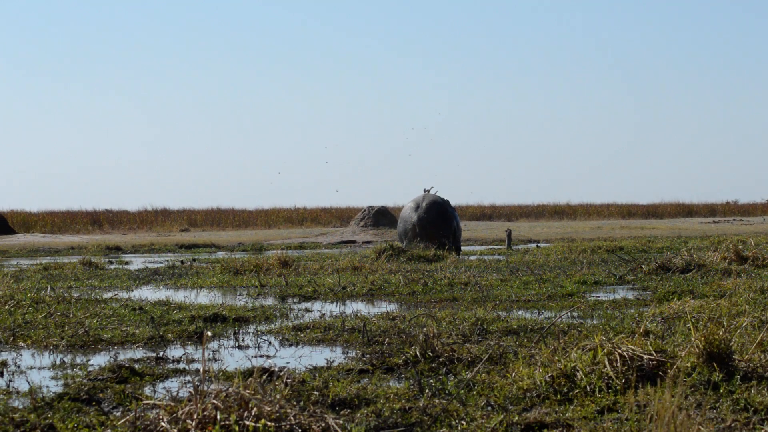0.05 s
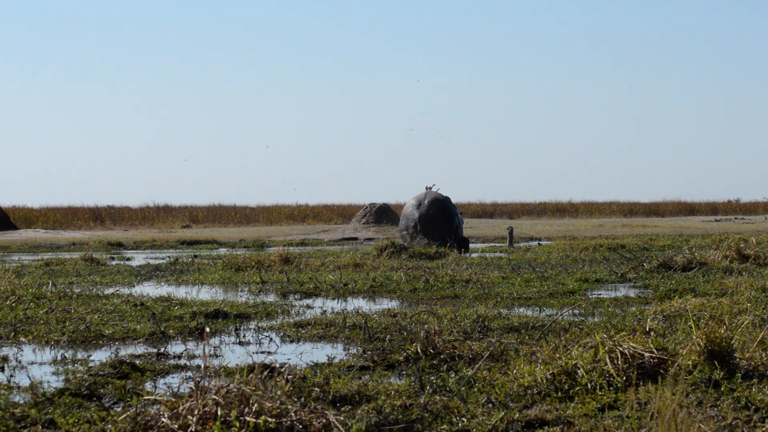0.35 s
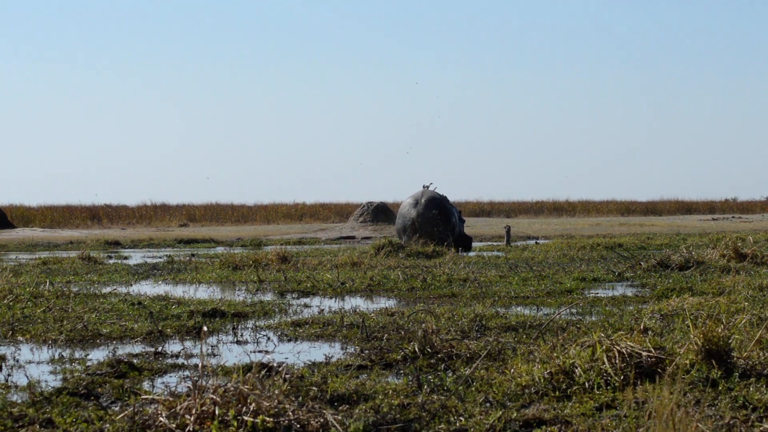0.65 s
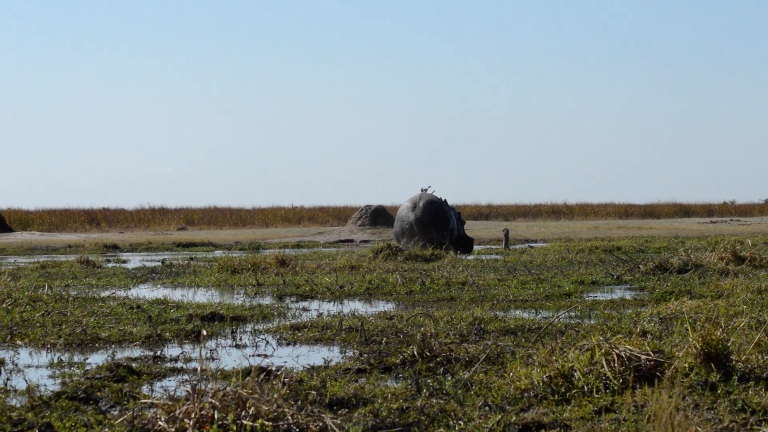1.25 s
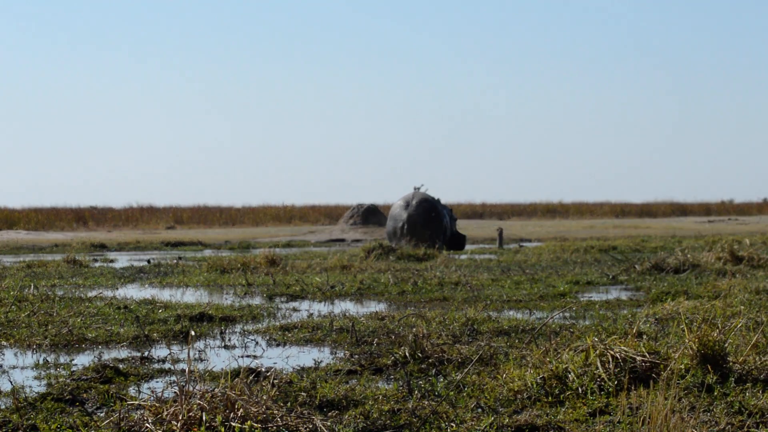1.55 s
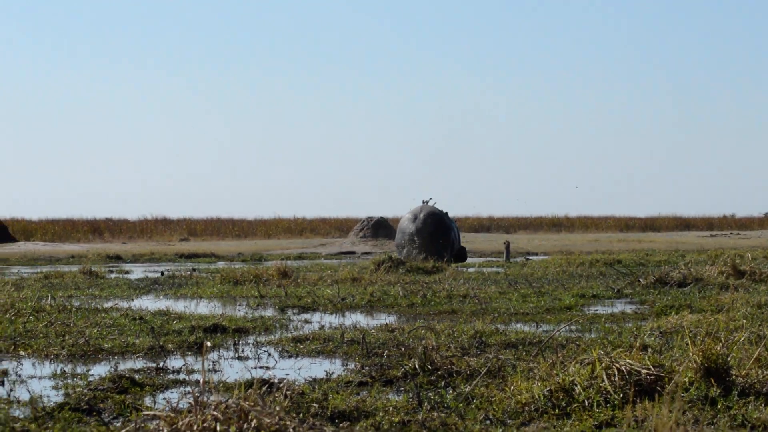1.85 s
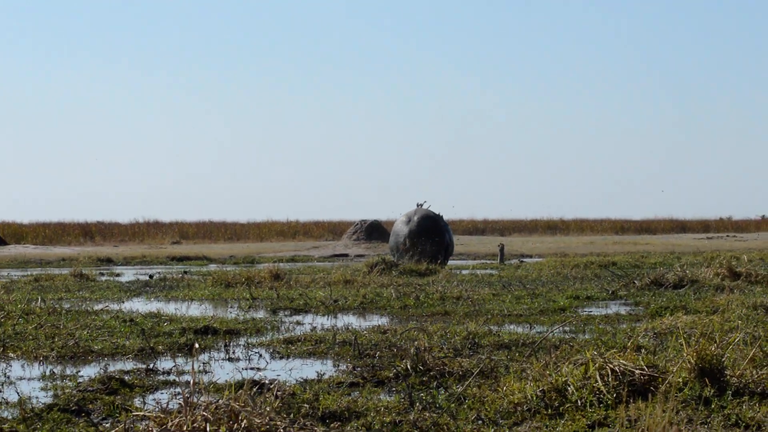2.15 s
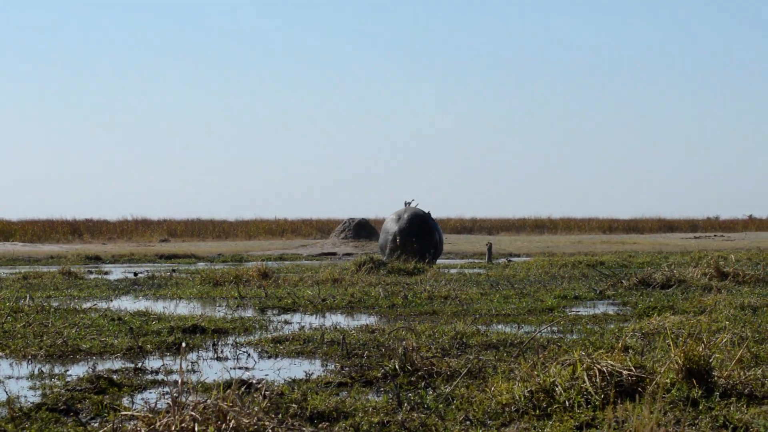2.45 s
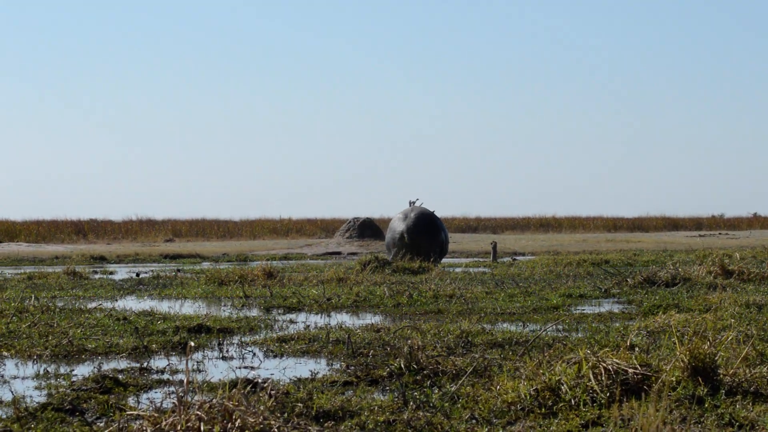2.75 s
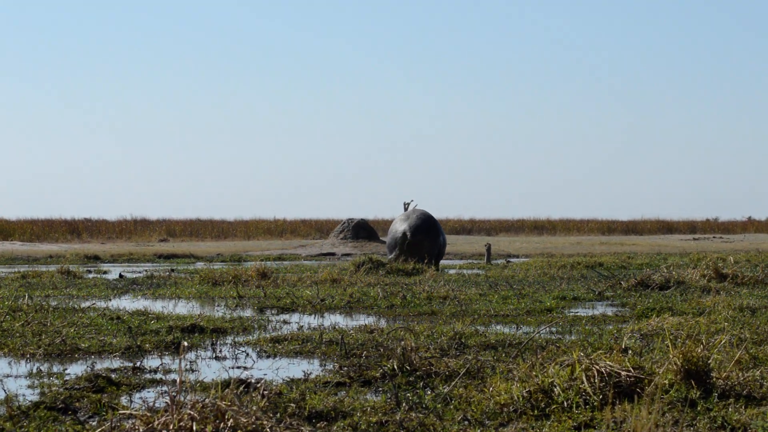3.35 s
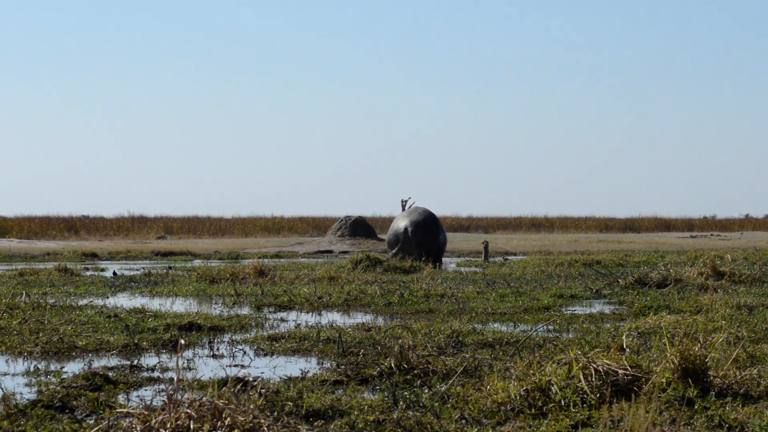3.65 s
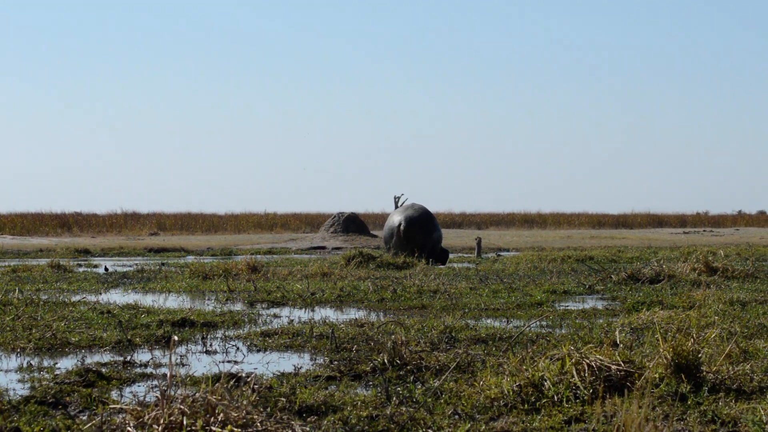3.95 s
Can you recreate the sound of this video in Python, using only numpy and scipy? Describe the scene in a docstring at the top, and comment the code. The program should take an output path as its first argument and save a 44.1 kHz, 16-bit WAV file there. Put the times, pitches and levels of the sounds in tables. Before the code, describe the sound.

Four short, raspy animal screeches, probably a bird, over low wind rumble outdoors.

```python
"""An animal close by, probably a bird, gives four harsh rasping calls on open wet grassland.
Each call is a fluttering jet of air that excites the resonances of the throat (source and filter),
with a pop near its start and a soft rasp after it. Wind buffets the microphone; small birds chirp
and whistle far off, and the wet ground ticks."""
import sys
import numpy as np
from scipy import signal
from scipy.fft import rfft, irfft
from scipy.io import wavfile
from scipy.ndimage import uniform_filter1d, map_coordinates

SR = 44100
rng = np.random.default_rng(int(sys.argv[2]) if len(sys.argv) > 2 else 0)


def to_wav(s):
    """Save 16-bit WAV."""
    ch = np.atleast_2d(s).T  # columns
    pcm = np.round(np.clip(ch, -1, 1) * 32767)  # PCM
    wavfile.write(sys.argv[1], SR, pcm.astype(np.int16))


N = 176400
TIME = np.arange(N) / SR

ATTACK_S, RELEASE_DB_PER_S = 0.0054, 1050
OPENING_DB = -4.5   # weaker air flow before the pop
FLUTTER_HZ, FLUTTER_JITTER, FLUTTER_DECAY_PER_CYCLE = 109.3, 0.14, 5
THROAT_RISE, THROAT_RISE_S = 0.13, 0.024   # share by which the screech is low at the pop; settling time
SQUEAL_HZ, SQUEAL_WANDER, SQUEAL_DB = 2860, 0.01413, -4
POP_DELAY_S, POP_WIDTH_S, POP_FALL_PER_S = 0.022, 0.0023, 48
SPIT_DB, SPIT_DELAY_S, SPIT_WIDTH_S = -20, 0.0031, 0.0021
AFTER_DELAY_S, AFTER_LENGTH_S, AFTER_ATTACK_S = 0.013, 0.044, 0.03
EDDIES_DB, RUMBLE_DB, FLAPS_DB = -2, 1.5, -35.5
BUZZ_HZ, BUZZ_DEPTH, BUZZ_WANDER = 229, 0.096, 0.018
TICK_DB, TICK_DECAY_S, TICK_RING = -12.5, 0.0039, 0.6
PATTER_PER_S, PATTER_DB, GRASS_DB = 36, -46.5, -56


def rasping_calls():
    """Source and filter: a pulsed jet drives the throat in a blend of screech and hiss."""
    # Each row: start in seconds, length in seconds, level in dB, swell in dB per second, the screech's
    # share of the power, pop level in dB, pop frequency in Hz, level of the after-rasp in dB.
    calls = [(1.358, 0.12, -17.5, -2, 0.79, -12, 1761, -35.5), (1.614, .16, -22, 3, 0.04, -22.5, 1600, -27),
             (1.891, 0.093, -18, 62, 0.82, -25, 1050, -35),
             (2.119, 0.049, -19.5, -25, 0.12, -18, 2008, -38.5)]
    # Throat resonances when screeching and when hissing.
    # Each row: frequency in Hz, nominal width in Hz, relative gain in dB.
    screech_resonances = [(2030, 150, -5), (2910, 150, 4), (3775, 100, -0.5), (4530, 190, -3),
                          (5470, 230, -10.5), (6360, 160, -9), (7070, 160, 0.5), (8270, 570, 0.5),
                          (8470, 180, -7), (9620, 350, -4.5), (11430, 300, -7.5), (12500, 240, -18),
                          (12900, 500, -19), (15400, 400, -28)]
    hiss_resonances = [(1116, 165, -8), (2014, 224, 1.5), (2990, 220, 3), (3550, 310, -1),
                       (4010, 130, -0.5), (4370, 150, 3), (4820, 330, 2.5), (5600, 240, -14),
                       (6550, 380, -4.5), (6960, 280, -12), (7980, 530, -7.5), (9500, 620, -6.5),
                       (11300, 300, -10), (13200, 750, -16)]
    # The bright spit that opens each call. Each row: frequency in Hz, relative spectral level in dB.
    spit_spectrum = [(2000, -16), (5000, -4), (8000, -1.5), (11000, 0), (13000, -19), (16000, -23)]
    air = fluttering_air(depth=0.5)
    screech = rms_one(throat(air, screech_resonances) + squeal(air))
    hiss = throat(fluttering_air(depth=0.24), hiss_resonances)
    splutter = rms_one(resonate_twice(noise(), hz=940, stage_width_hz=1800))
    spit = colour(noise(), spit_spectrum)
    out = np.zeros(N)
    for start, length, db, swell, share, pop_db, pop_hz, after_db in calls:
        t = TIME - start
        opened = np.clip((t - POP_DELAY_S) / ATTACK_S + 1, 0, 1)   # reaches 1 at the pop
        share = share * opened
        voice = np.sqrt(share) * rising(screech, t) + np.sqrt(1 - share) * hiss
        effort_db = db + swell * (np.clip(t, 0, length) - length / 2) + OPENING_DB * (1 - opened)
        out += from_db(effort_db) * envelope(start, length, ATTACK_S) * voice
        out += from_db(SPIT_DB) * gaussian(t - SPIT_DELAY_S, SPIT_WIDTH_S) * spit
        out += from_db(pop_db) * pop(t, pop_hz, splutter)
        after_rasp = envelope(start + length + AFTER_DELAY_S, AFTER_LENGTH_S, AFTER_ATTACK_S)
        out += from_db(after_db) * after_rasp * hiss
    return out


def fluttering_air(depth):
    """Flow modulation: an unevenly flapping membrane chops a share `depth` of the air into pulses."""
    cycles = np.cumsum(FLUTTER_HZ * (1 + FLUTTER_JITTER * drift(40))) / SR
    pulses = rms_one(np.exp(-FLUTTER_DECAY_PER_CYCLE * (cycles % 1)))
    return 1 - depth + depth * pulses


def throat(air, resonances):
    """Forced resonance: flow noise rings the throat's modes, over broadband turbulence."""
    # Turbulence of the jet. Each row: frequency in Hz, relative spectral level in dB.
    turbulence = [(500, -7), (1100, 1), (1550, -20), (2000, -3), (2330, -9), (4500, 8), (9000, 1),
                  (12000, -11), (16000, -15)]
    modes = sum(from_db(db) * resonate_twice(air * noise(), hz, 2 * width)
                for hz, width, db in resonances)
    return rms_one(modes) + from_db(-9.5) * colour(air * noise(), turbulence)


def squeal(air):
    """Self-sustained oscillation: the air flow keeps unsteady, inharmonic tones going."""
    # Tones inside the screech. Each row: ratio to SQUEAL_HZ, relative level in dB.
    partials = [(1, -1.5), (1.33, -9), (1.55, -3.5), (1.95, -11.5), (2.449, -7), (2.859, -6)]
    tones = sum(from_db(db) * sine(ratio * SQUEAL_HZ * (1 + SQUEAL_WANDER * drift(153)))
                for ratio, db in partials)
    return from_db(SQUEAL_DB) * rms_one(tones * uniform_filter1d(air, size=88))


def rising(screech, t):
    """Frequency glide by time warping: the screech's resonances start low and settle."""
    since_pop = np.maximum(t, 0) - POP_DELAY_S
    lead_s = THROAT_RISE * THROAT_RISE_S * np.exp(-since_pop / THROAT_RISE_S)
    return map_coordinates(screech, [(TIME + lead_s) * SR], order=3, mode="nearest")


def pop(t, hz, splutter):
    """A brief pulse has a broad spectrum: a falling tone and noise under one narrow Gaussian."""
    from_peak = np.clip(t - POP_DELAY_S, -0.02, 0.02)
    falling = sine(hz * np.exp(-POP_FALL_PER_S * from_peak))
    return gaussian(from_peak, POP_WIDTH_S) * (falling + splutter)


def wind():
    """Turbulent pressure on the microphone: lumpy eddies ride the gusts over a deep rumble."""
    # Strength of the gusts and of the rumble. Each row: time in seconds, relative level in dB.
    gust_levels = [(0.0, -30), (0.09, -26.5), (0.24, -21.5), (0.29, -59.5), (0.36, -13), (0.47, -32),
                   (0.59, -22), (0.7, -34.5), (0.73, -21), (0.87, -22.5), (0.89, -14), (0.91, -35.5),
                   (1.21, -15.5), (1.51, -18.5), (1.57, -27), (1.66, -19), (1.99, -29), (2.12, -18),
                   (2.14, -28.5), (2.15, -11.5), (2.18, -24.5), (2.57, -15.5), (2.64, -28), (3.02, -20.5),
                   (3.03, -28), (3.12, -21.5), (3.36, -19.5), (3.61, -26.5), (3.63, -13.5), (3.65, -39.5),
                   (3.68, -21), (3.93, -26.5), (3.94, -19), (4.0, -32)]
    rumble_levels = [(0.0, -32.5), (0.07, -20), (0.14, -41), (0.18, -19), (0.29, -36), (0.42, -24.5),
                     (0.44, -30), (1.1, -31.5), (1.19, -27), (3.1, -30), (3.25, -24), (3.71, -34),
                     (3.73, -24.5), (4.0, -34)]
    # Spectra of the eddies, the rumble and the flaps (small fast eddies).
    # Each row: frequency in Hz, relative spectral level in dB.
    eddy_spectrum = [(40, -24), (100, -5), (190, 3.5), (280, -1), (400, -10.5), (600, -30.5), (900, -44),
                     (1400, -58), (3000, -75)]
    rumble_spectrum = [(20, -25), (35, -6.5), (60, -1), (120, 4), (180, -6), (300, -24.5), (800, -63)]
    flap_spectrum = [(100, -23), (250, -0.5), (400, 0.5), (600, -9.5), (900, -24), (1400, -41.5),
                     (3000, -70)]
    gust_db = np.interp(TIME, *np.transpose(gust_levels))
    eddies = from_db(gust_db + EDDIES_DB) * colour(noise() * from_db(4 * drift(82)), eddy_spectrum)
    rumble_db = RUMBLE_DB + np.interp(TIME, *np.transpose(rumble_levels))
    rumble = from_db(rumble_db) * colour(noise(), rumble_spectrum)
    lumps = from_db(7 * np.clip(drift(47), -2, 2))
    flap_db = FLAPS_DB + 1.44 * (gust_db - gust_db.mean())   # flaps swing more widely than the gusts
    flaps = from_db(flap_db) * colour(noise() * lumps, flap_spectrum)
    return eddies + flaps + rumble


def buffets(low_cut_hz=82):
    """Bipolar pressure pulses: each of the strongest eddies hits as one push and one pull."""
    # Each row: time in seconds, peak level before the low cut in dB, half width in milliseconds.
    hits = [(.093, -10, 1.6), (.17, -7.5, 1.7), (0.353, -7, 1.4), (.371, -14, .9), (0.384, -9, 0.96),
            (.41, -12, 1.03), (0.884, -8, 1.17), (1.14, -12, 1.16), (1.181, -9.5, 0.78), (1.204, -8.5, 0.7),
            (1.3652, -4.5, 0.7), (1.433, -14, 1.5), (1.461, -9, 0.99), (1.474, -16, 0.65),
            (1.483, -10, 0.94), (1.501, -9.5, 0.88), (1.518, -9, 0.95), (1.638, -12.5, 0.31),
            (1.66, -8.5, 1.63), (1.699, -16, 1.5), (1.77, -8, 1.6), (1.862, -17, 0.83), (2.101, -12, 0.83),
            (2.1532, -2, 0.81), (2.227, -21.5, 0.63), (2.369, -15, 0.63), (2.448, -8.5, 0.91),
            (2.495, -8.5, 0.99), (2.758, -10.5, 1.08), (2.879, -6, 1), (2.975, -11, 1.2),
            (3.013, -12.5, 1.24), (3.093, -19, 0.66), (3.14, -12, 0.8), (3.214, -11.5, 0.8),
            (3.375, -9, 0.8), (3.413, -13, 1.6), (3.547, -10.5, 0.85), (3.63, -10, 1.08),
            (3.761, -10.5, 1.3), (3.845, -11, 1.22), (3.941, -7.5, 1.14)]
    pressure = np.zeros(N)
    for centre, db, half_ms in hits:
        u = (TIME - centre) * 1000 / half_ms
        pressure -= from_db(db) * 2.75 * u / (1 + u * u / 2) ** 3   # 2.75 brings the shape's peak to 1
    return signal.sosfilt(signal.butter(2, low_cut_hz, "high", fs=SR, output="sos"), pressure)


def far_chirps(buzz):
    """Frequency modulation: sidebands roughen the falling chirps of small birds."""
    # Each row: start in seconds, length in seconds, first and last pitch in Hz, level in dB.
    chirps = [(0.21, 0.066, 6280, 4900, -45.5), (0.637, 0.07, 5660, 4300, -45),
              (1.105, 0.029, 6600, 6200, -55), (1.534, 0.041, 5930, 4300, -45.5),
              (2.262, .055, 6100, 4800, -51.5), (2.84, 0.046, 5900, 5200, -56),
              (2.882, 0.11, 6440, 4900, -55), (3.048, 0.088, 6800, 4900, -50.5),
              (3.56, .035, 5300, 4900, -46), (3.942, .065, 6100, 4800, -51.5)]
    roughness = BUZZ_DEPTH * buzz + BUZZ_WANDER * drift(645)
    return sum(note(*row, roughness, octave_db=-25) for row in chirps)


def far_whistles():
    """Periodic frequency modulation: thin whistles warble as they glide down."""
    # Each row: start in seconds, length in seconds, first and last pitch in Hz, level in dB,
    # warble depth as a share of the pitch, warble rate in Hz.
    whistles = [(.66, 0.1, 5210, 4950, -49.5, .008, 220), (0.646, 0.12, 2660, 2510, -52.5, .008, 220),
                (1.322, 0.053, 4420, 4380, -42, .008, 200), (1.819, 0.096, 3860, 3340, -38.5, 0.066, 115),
                (2.315, 0.21, 4020, 3840, -46, 0.033, 235), (2.851, 0.19, 3810, 3710, -56, .01, 220),
                (3.412, 0.24, 2660, 2407, -50.5, 0.028, 150)]
    waver = 0.0037 * drift(105)
    return sum(note(*row, depth * np.sin(2 * np.pi * rate * TIME) + waver, octave_db=-18)
               for *row, depth, rate in whistles)


def far_squeaks_and_rasps(buzz):
    """Filtered noise: a high band makes the birds' squeaks, a broad modulated one their soft rasps."""
    # Each row: start in seconds, length in seconds, centre frequency in Hz, level in dB.
    squeaks = [(0.81, 0.011, 10300, -44), (2.241, 0.018, 10700, -57), (2.935, 0.014, 10700, -41.5),
               (3.134, 0.006, 9500, -43), (3.473, 0.039, 9500, -47.5)]
    # Each row: start in seconds, length in seconds, level in dB.
    rasps = [(0.204, 0.17, -57), (0.664, 0.13, -52.5), (1.534, 0.088, -50.5), (2.289, 0.22, -45),
             (2.88, 0.28, -69), (3.464, .08, -48.5)]
    # Each row: frequency in Hz, relative spectral level in dB.
    rasp_spectrum = [(700, -6), (1200, -1.5), (2500, 3), (3600, -0.5), (5200, -4.5), (6500, -12),
                     (8200, -5.5), (10500, -16.5), (14000, -28)]
    breath = noise()
    squeaking = sum(from_db(db) * arch(start, length) * rms_one(resonate(breath, hz, width_hz=1800))
                    for start, length, hz, db in squeaks)
    rasp_gain = sum(from_db(db) * arch(start, length) for start, length, db in rasps)
    return squeaking + rasp_gain * colour(breath * (1 + 0.37 * buzz), rasp_spectrum)


def wet_ground():
    """Damped transients: wet grass and water tick with a broad ring, amid patter and the grass's hiss."""
    # Each row: start in seconds, relative level in dB, ring frequency in Hz.
    ticks = [(0.0169, -28.5, 4470), (0.4271, -25.5, 4490), (0.6302, -25.5, 4870), (0.6363, -33, 4450),
             (0.8359, -23, 3950), (1.043, -22.5, 3880), (1.251, -24.5, 4570), (2.0867, -26, 2590),
             (2.3042, -25.5, 2820), (2.5176, -27, 4600), (2.5981, -30.5, 2840), (2.7334, -27, 3000),
             (2.816, -30.5, 4720), (2.94, -26, 5350), (2.9505, -26, 5080), (3.1343, -25.5, 9400),
             (3.168, -22, 3600), (3.3853, -26, 4340), (3.479, -43, 2560), (3.77, -28.5, 2800)]
    # Noise of the ticks, patter and hiss. Each row: frequency in Hz, relative spectral level in dB.
    grass_spectrum = [(500, 6.5), (1500, -1.5), (3000, 4.5), (4800, 2), (6500, -7), (9500, -4.5),
                      (12000, -15), (16000, -27.5)]
    spray = colour(noise(), grass_spectrum)
    ticking = np.zeros(N)
    for start, db, hz in ticks:
        burst = (TIME >= start) * np.exp(-np.clip((TIME - start) / TICK_DECAY_S, 0, 20))
        ring = rms_one(resonate(spray, hz, width_hz=630))
        ticking += from_db(db + TICK_DB) * burst * (spray + TICK_RING * ring)
    drops = (rng.random(N) < PATTER_PER_S / SR) * from_db(PATTER_DB + rng.uniform(-8.5, 5.8, N))
    patter = signal.lfilter([1], [1, -np.exp(-1 / (TICK_DECAY_S * SR))], drops + 1e-18)
    hiss = from_db(GRASS_DB + 0.29 * drift(1.7)) * colour(noise(), grass_spectrum)
    return ticking + patter * spray + hiss


def note(start, length, from_hz, to_hz, db, warble, octave_db):
    """Two harmonics glide and warble together under a rounded envelope."""
    progress = np.clip((TIME - start) / length, 0, 1)
    hz = (from_hz + (to_hz - from_hz) * progress) * (1 + warble)
    return from_db(db) * np.sqrt(2) * arch(start, length) * (sine(hz) + from_db(octave_db) * sine(2 * hz))


def envelope(start, length, attack):
    """Linear attack, hold and quick exponential decay."""
    t = TIME - start
    return np.clip(t / attack, 0, 1) * from_db(-RELEASE_DB_PER_S * np.clip(t - length, 0, 0.2))


def arch(start, length):
    """A half-sine rise and fall."""
    return np.sin(np.pi * np.clip((TIME - start) / length, 0, 1))


def gaussian(t, width):
    """A bell-shaped pulse with its peak at t = 0."""
    return np.exp(-0.5 * (t / width) ** 2)


def sine(hz):
    """An oscillator whose phase is the integral of its frequency."""
    return np.sin(2 * np.pi * np.cumsum(hz) / SR)


def resonate(x, hz, width_hz):
    """A damped two-pole resonator with unit peak gain."""
    r = np.exp(-np.pi * width_hz / SR)
    feedback = [1, -2 * r * np.cos(2 * np.pi * hz / SR), r * r]
    return signal.lfilter(np.array([1, 0, -1]) * (1 - r * r) / 2, feedback, x + 1e-18)


def resonate_twice(x, hz, stage_width_hz):
    """Two equal resonators in cascade give steeper skirts."""
    return resonate(resonate(x, hz, stage_width_hz), hz, stage_width_hz)


def colour(x, spectrum):
    """Spectral shaping by rows of frequency in Hz and level in dB, at unit power."""
    hz, db = np.transpose(spectrum)
    bins = np.maximum(np.arange(N // 2 + 1) * SR / N, 1)
    gain = from_db(np.interp(np.log(bins), np.log(hz), db))
    return rms_one(irfft(rfft(x) * gain, N))


def drift(rate_hz):
    """Low-passed noise: a random fluctuation of unit power."""
    step, warm_up = 20, 2000
    r = np.exp(-2 * np.pi * rate_hz * step / SR)
    slow = signal.lfilter([1], [1, -2 * r, r * r], rng.standard_normal(N // step + warm_up + 2))[warm_up:]
    return np.interp(np.arange(N) / step, np.arange(len(slow)), rms_one(slow))


def noise():
    """White Gaussian noise."""
    return rng.standard_normal(N)


def from_db(db):
    """Decibels to amplitude ratio."""
    return 10 ** (np.asarray(db) / 20)


def rms_one(x):
    """Normalisation to unit power."""
    return x / np.sqrt(np.mean(x ** 2) + 1e-20)


def scene():
    """Superposition: all sources add in the open air at one microphone."""
    calls = rasping_calls()
    buzz = sine(BUZZ_HZ * (1 + 0.051 * drift(23)))
    small_birds = far_chirps(buzz) + far_whistles() + far_squeaks_and_rasps(buzz)
    return (calls + wind() + buffets() + small_birds + wet_ground())[None]


def record(dry, cutoff_hz=16100):
    """Clipping and band limiting: peaks stop at full scale, then a steep low-pass cuts the top."""
    low_pass = signal.ellip(10, 0.2, 80, cutoff_hz, fs=SR, output="sos")
    return signal.sosfilt(low_pass, np.clip(dry, -1, 1))


dry = scene()
out = record(dry)
to_wav(out)
```